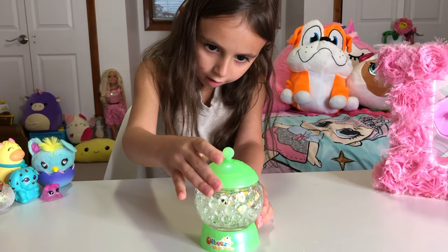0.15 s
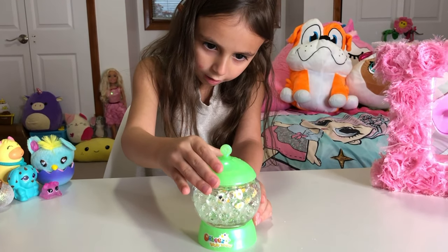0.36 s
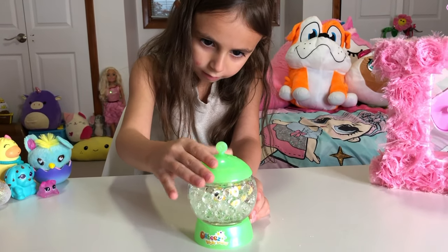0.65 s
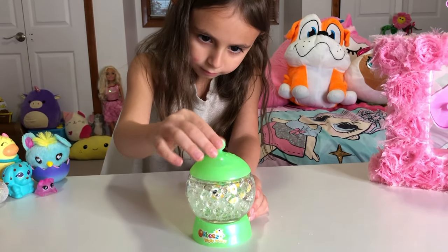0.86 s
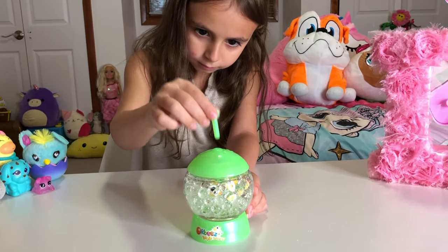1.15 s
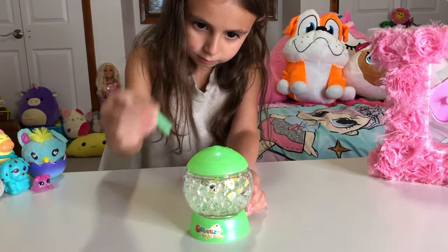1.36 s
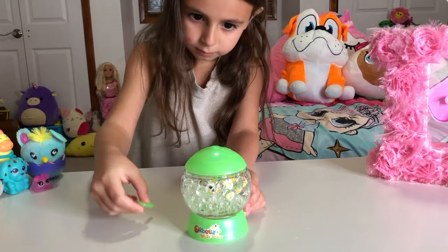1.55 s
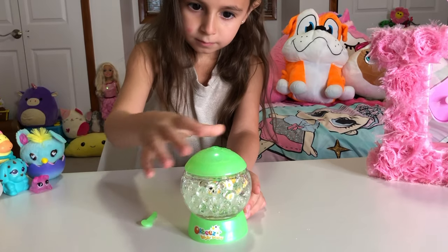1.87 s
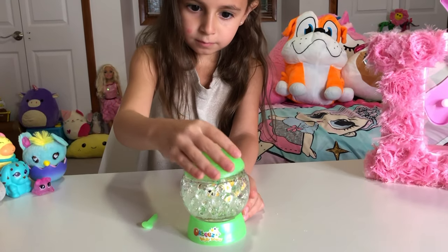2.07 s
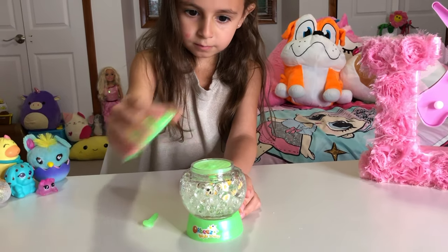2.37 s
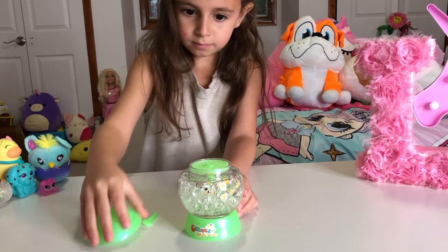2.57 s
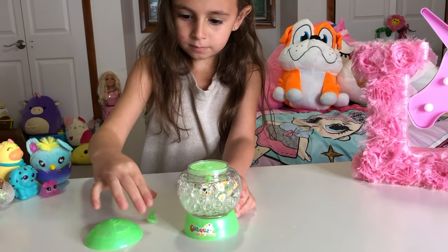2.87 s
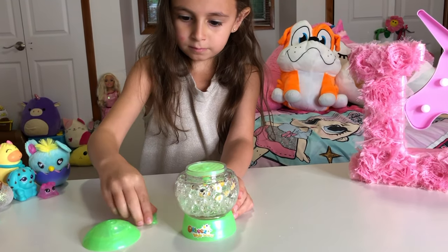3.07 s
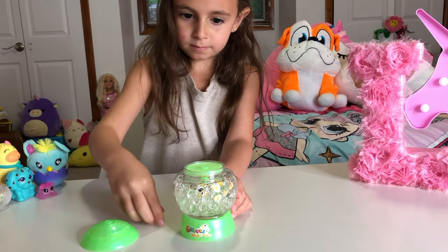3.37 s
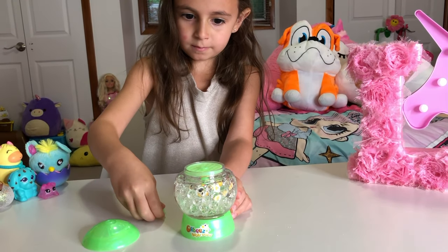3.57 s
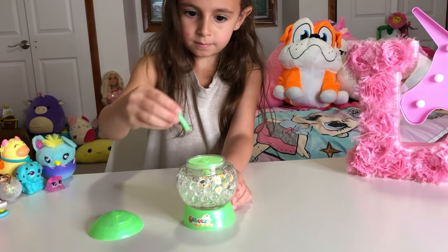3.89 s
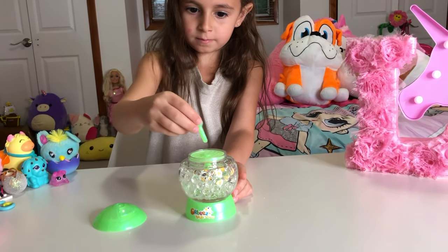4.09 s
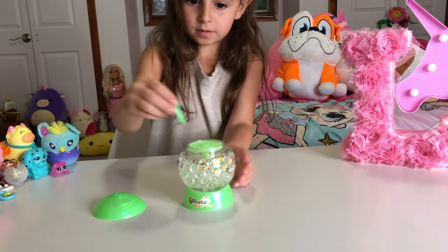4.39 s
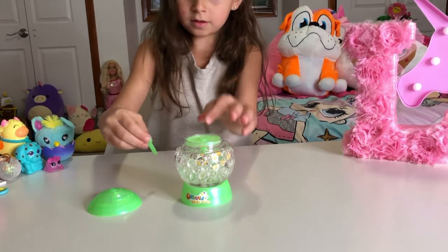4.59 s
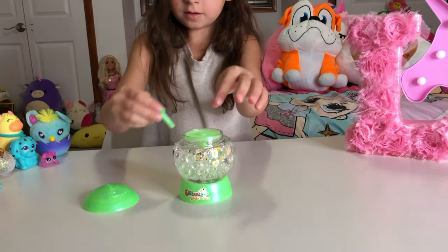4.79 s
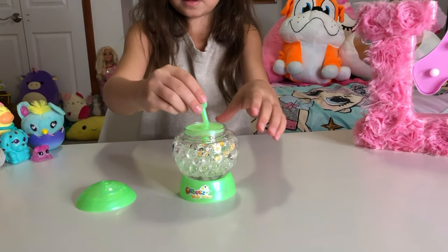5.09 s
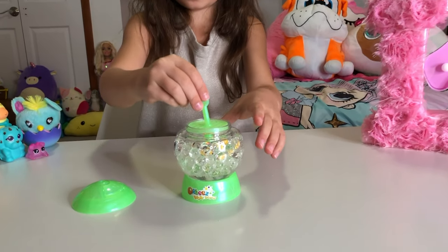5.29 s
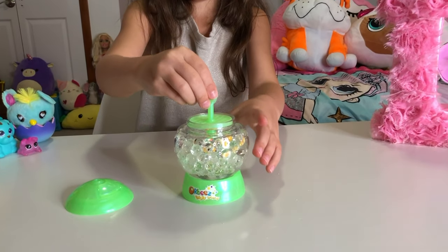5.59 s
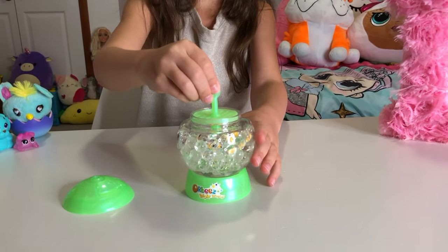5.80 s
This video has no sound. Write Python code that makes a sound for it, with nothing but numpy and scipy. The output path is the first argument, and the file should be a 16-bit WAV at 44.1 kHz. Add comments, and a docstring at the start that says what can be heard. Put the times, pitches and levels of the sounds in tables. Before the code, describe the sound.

Close to one microphone in a small room, a hollow plastic toy clicks as its peg comes out. The peg bounces on the table, and the lid pulls free with a quick cluster of snaps. Set down, the lid knocks loudly and wobbles in quickening bounces. After a quieter stretch of fingertip bumps and scuffs, the peg taps lightly at the toy. A low machine hum and faint hiss continue underneath.

```python
"""A plastic toy gumball globe, handled on a table in a small bedroom, close to a single microphone.
Its peg is pulled from the top and drops rattling; the lid snaps off, is put down and wobbles to rest;
then the peg pokes at the globe. Each contact briefly rings the plastic or the table, amid light scuffs.
Behind it lie the room's short echo, a low machine hum, a faint hiss and slowly swaying air."""
import sys
import numpy as np
from scipy import signal
from scipy.fft import rfft, irfft, next_fast_len
from scipy.io import wavfile

SR = 44100
rng = np.random.default_rng(int(sys.argv[2]) if len(sys.argv) > 2 else 0)


def bounce(signal):
    """Save signal as a 16-bit WAV file at the path given by the first command-line argument."""
    frames = np.transpose(np.atleast_2d(signal))
    limited = np.clip(frames, -1, 1)
    pcm = np.round(limited * 32767).astype(np.int16)
    wavfile.write(sys.argv[1], SR, pcm)


N = 262350
TIME = np.arange(N) / SR
AGE = TIME[:SR // 4]   # s since a contact
THUMP_HZ, KNOCK_HZ, CLICK_HZ = 165, 650, 2300   # where bass, middle and treble begin
CUTOFF_HZ = 15900

# Touches: t/s, bass level/dB, hardness/dB gained per step from bass to middle to treble
UNPLUG_TAPS = [(.562, -52, -9.5), (.6914, -32.5, 0.5), (.7286, -34, -3), (.7365, -59, 3)]
CATCH_SNAPS = [(.636, -47.5, -21), (.8945, -46.5, -10), (1.998, -45.5, -22), (2.009, -47, -18),
               (2.038, -49.5, -6.5), (2.0902, -31.5, -11.5), (2.0975, -41.5, 0), (2.1025, -35, -8),
               (2.1211, -36, 2)]
TIP_POKES = [(5.104, -46, -9), (5.2512, -44.5, 0.5), (5.357, -55, -6.5), (5.523, -47, -18.5),
             (5.559, -39.5, -9.5)]
FINGERTIP_THUDS = [(3.036, -41.5, -14), (3.05, -50.5, -3.5), (3.07, -53, -6.5)]
# Loose pieces striking the table: t/s, strength/dB
PEG_LANDINGS = [(1.6467, -52.5), (1.654, -52), (1.6583, -59), (1.7054, -40), (1.7314, -37.5),
                (1.7403, -44.5), (1.748, -55), (1.7668, -52), (1.7781, -50.5), (1.7876, -54),
                (1.8027, -53.5), (1.824, -70), (3.415, -64), (3.6825, -58.5), (3.689, -63)]
LID_LANDINGS = [(2.6208, -20), (2.627, -30), (2.753, -20), (2.7955, -28), (2.8353, -29.5), (2.8488, -35),
                (2.8691, -28.5), (2.8908, -30.5), (2.903, -32.5), (2.9106, -34)]
# Modes of each struck thing: f/Hz, least width/Hz, relative level/dB
GLOBE_RING = [(190, 6.5, -15), (257, 26, 7.5), (284, 13, 0), (354, 46, -6), (493, 150, -8.5),
              (670, 120, -12), (860, 190, -14), (1170, 71, -21), (1490, 160, -15), (1620, 60, -25),
              (2830, 97, -38), (3570, 150, -22), (3940, 320, -15.5), (4550, 340, -22), (5770, 250, -21),
              (6700, 450, -29), (7800, 840, -33), (12100, 1000, -26)]
RIM_RING = [(187, 11, -33), (260, 9, -4), (342, 35, 3.5), (428, 44, -3), (580, 69, -12), (724, 58, -11),
            (846, 110, -6), (962, 240, -10), (1190, 160, -10), (1480, 120, -11), (1660, 210, -14.5),
            (2640, 460, -15.5), (3730, 450, -18.5), (4650, 190, -16.5), (5600, 290, -25), (8550, 2000, -27),
            (11800, 1200, -33)]
POKE_RING = [(200.3, 10, -4.5), (257.4, 37, 0), (360, 24, -7.5), (525, 110, -20), (1066, 87, -17),
             (1190, 106, -20), (2760, 150, -38), (3500, 240, -17), (4200, 260, -15.5), (4750, 290, -21),
             (8950, 1200, -27)]
PEG_RING = [(257, 27, 7), (363, 43, 3), (525, 55, 5), (674, 44, 11.5), (1070, 190, -6), (1670, 280, 4),
            (2390, 870, -6), (3830, 770, 4), (4530, 900, 4), (6050, 770, 4), (9800, 2000, -9),
            (12500, 3000, -18)]
LID_RING = [(188, 20, -18), (268, 15, -14), (384, 28, 1), (530, 105, 1), (664, 42, -7), (980, 54, -29),
            (1016, 55, -6.5), (1185, 36, -13), (1270, 38, 4), (1392, 123, 3), (1527, 79, 0.5),
            (1586, 120, -2.5), (1645, 57, -16.5), (2140, 120, -25), (2540, 350, -13), (3980, 200, -9.5),
            (4420, 210, -16.5), (6200, 280, -19), (8700, 990, -29), (11200, 1000, -22)]
TABLE_RING = [(194, 26, -0.5), (254.5, 14, 5.5), (276, 24, -14), (363, 46, -6), (596, 110, -17),
              (3530, 590, -22.5)]
# Dips in the globe's spectrum: f/Hz, width/Hz, gain/dB
GLOBE_DIPS = [(1080, 140, -7), (1930, 420, -9), (5150, 450, -5), (10400, 1500, -7)]
# Brief scuffs, light ticks and a bright accent on one lid bounce: t/s, half length/s, level/dB, f/Hz
SCUFFS_AND_TICKS = [(0.7297, 0.0012, -39, 3700), (.733, 0.0061, -45, 1580), (1.024, 0.026, -63.5, 840),
                    (1.026, 0.028, -64.5, 5300), (2.012, 0.014, -60, 493), (2.721, 0.02, -53.5, 4370),
                    (2.833, .004, -33, 1370), (2.893, 0.0021, -34.5, 4200), (3.058, 0.036, -67, 4930),
                    (3.529, 0.051, -61.5, 700), (3.683, 0.011, -55.5, 2460), (4.40, 0.1, -71.5, 870),
                    (4.44, 0.04, -70, 2500), (4.493, 0.0073, -61, 8950), (4.52, 0.0073, -59.5, 2060)]
# Dull shifts of an arm: t/s, level/dB
ARM_MOVES = [(2.88, -49), (3.18, -51), (4.53, -43), (4.64, -39)]
# The bedroom's reverberation: f/Hz, level/dB, t60/s
BEDROOM_BANDS = [(148, -15, 0.41), (388, -1.5, 0.21), (805, -7.5, 0.28), (1560, -9, 0.41),
                 (3030, -10.5, 0.34), (6000, -9.5, 0.28), (10000, -7, 0.28), (16000, -22, .22)]
# Low machine hum in the house: f/Hz, width/Hz, level/dB
HOUSE_HUM = [(14.6, 5, -44.5), (64.6, 10.3, -52.5), (102.4, 23, -62.5), (257.7, 4.3, -70.5),
             (355.5, 7.7, -80)]
# Spectrum of the hiss: f/Hz, relative level/dB
HISS_SHAPE = [(76, -36), (130, -17), (141, -19.5), (172, -7), (224, -10), (258, -4.5), (285, -7),
              (342, -7.5), (410, -10.5), (435, -11), (796, -18), (5960, -21), (16000, -24.5)]


def globe():
    """The hollow globe rings under the hand, with a few dips in its spectrum."""
    # the peg is wiggled and unplugged
    taps = strikes(pressed(UNPLUG_TAPS, middle_db=-2), GLOBE_RING, snap_db=-57,
                   crack=(-28, 0.011), chatter=(4.5, 0.0047), top_hz=10800, db_per_octave=15,
                   detune=0.0075)
    # the lid is gripped and slips over its catch
    snaps = strikes(pressed(CATCH_SNAPS, middle_db=3.5), RIM_RING, snap_db=-54,
                    crack=(-31.5, 0.011), chatter=(-1, 0.011), top_hz=10800, db_per_octave=12,
                    detune=0.0039)
    # the peg's tip pokes into the open top
    pokes = strikes(pressed(TIP_POKES, middle_db=-0.5), POKE_RING, snap_db=-57,
                    crack=(-33, 0.018), chatter=(-4.5, 0.0087), top_hz=6900, db_per_octave=8.5,
                    detune=0.0065)
    shell = taps + snaps + pokes
    for hz, width, db in GLOBE_DIPS:
        notched = signal.lfilter(*signal.iirnotch(hz, hz / width, fs=SR), shell)
        shell = from_db(db) * shell + (1 - from_db(db)) * notched
    return shell


def peg_rattle():
    """The loose peg bounces on the table in bright clicks."""
    contacts = dropped(PEG_LANDINGS, colour_db=(-13, -5, 0), shares=(0.5, 0.59, 1.0))
    return strikes(contacts, PEG_RING, snap_db=-22, crack=(2.5, 0.0043), chatter=(-1.5, 0.04),
                   top_hz=12300, db_per_octave=11, detune=0.019)


def lid_wobble():
    """The lid is put down, let go and wobbles to rest in quickening bounces."""
    contacts = dropped(LID_LANDINGS, colour_db=(-15, 0, -7), shares=(0.56, 0.81, 1.16))
    return strikes(contacts, LID_RING, snap_db=-19.5, crack=(-19.5, 0.039), chatter=(1.5, 0.03),
                   top_hz=11460, db_per_octave=17.5, detune=0.014)


def lid_roll(let_go_s=2.7, relative_db=-9.5, rise_t60=0.03, fall_t60=0.1):
    """Once let go, the rim rolls into and out of each bounce and keeps the lid's main ring sounding."""
    power = 0
    for s, db in LID_LANDINGS:
        if s > let_go_s:
            t60 = np.where(TIME < s, rise_t60, fall_t60)
            power += (from_db(db + relative_db) * fade(np.abs(TIME - s), t60)) ** 2
    return np.sqrt(power) * hum(centre_hz=1380, width_hz=980)


def finger_thuds():
    """Fingertips land on the table and ring its low modes."""
    return strikes(pressed(FINGERTIP_THUDS, middle_db=-0.5), TABLE_RING, snap_db=-53,
                   crack=(-27, 0.031), chatter=(-6, 0.036), top_hz=8500, db_per_octave=25, detune=0.0088)


def pressed(touches, middle_db):
    """Time and bass, middle and treble levels of each touch: its hardness tilts them."""
    return [(s, db, db + hardness + middle_db, db + 2 * hardness) for s, db, hardness in touches]


def dropped(bounces, colour_db, shares):
    """Bass, middle and treble each lose their share of what a bounce lacks against the hardest."""
    hardest_db = max(db for s, db in bounces)
    return [(s, *[hardest_db + colour + share * (db - hardest_db)
                  for colour, share in zip(colour_db, shares)]) for s, db in bounces]


def strikes(contacts, modes, snap_db, crack, chatter, top_hz, db_per_octave, detune):
    """A snap and a chatter ring the main modes; dense short ones crack. Bursts are (level/dB, t60/s)."""
    out = np.zeros(N + len(AGE))
    hz, width, mode_db = np.transpose(modes)
    width = np.maximum(width, hz / 28)   # soft plastic is lossy: a few dozen cycles at most
    heights = from_db(mode_db) * 2 * np.pi * width / SR
    decays = np.exp(-np.pi * width[:, None] * AGE)
    hardest_db = max(row[-1] for row in contacts)
    for s, *levels_db in contacts:
        # spot and grip vary each mode's pitch and strength
        pitches = hz * np.exp(detune * rng.standard_normal(len(hz)))
        strengths = heights * from_db(rng.standard_normal(len(hz)))
        ring = strengths @ (np.sin(2 * np.pi * pitches[:, None] * AGE) * decays)
        blow = ring + signal.fftconvolve(ring, burst(*chatter))[:len(AGE)] + burst(*crack)
        blow[0] += from_db(snap_db)
        # a lighter touch stays in contact longer and so is duller
        edge_hz = top_hz * 2 ** ((levels_db[-1] - hardest_db) / db_per_octave)
        blow = cut(blow, [THUMP_HZ, edge_hz], "band")
        bass = cut(blow, KNOCK_HZ, "low", order=3)
        middle = cut(blow, [KNOCK_HZ, CLICK_HZ], "band", order=3)
        treble = cut(blow, CLICK_HZ, "high", order=3)
        start = int(s * SR)
        for part, db in zip((bass, middle, treble), levels_db):
            out[start:start + len(AGE)] += from_db(db) * part / np.std(part[:SR // 100])
    return out[:N]


def scuffs_and_ticks(grain_db=4):
    """Brief scuffs, light ticks and a bright accent on one lid bounce: grainy noise swells and dies."""
    out = np.zeros(N)
    peak_s = AGE.mean()
    for s, half_length, db, hz in SCUFFS_AND_TICKS:
        grains = rng.standard_normal(len(AGE)) * from_db(grain_db * rng.standard_normal(len(AGE)))
        octave = rms_one(cut(grains, [hz / np.sqrt(2), hz * np.sqrt(2)], "band"))
        start = int((s - peak_s) * SR)
        out[start:start + len(AGE)] += from_db(db) * swell(AGE - peak_s, half_length) * octave
    return out


def bedroom(x, build_up_s):
    """Diffuse echoes build up at the microphone over a few milliseconds and die band by band."""
    t = TIME[:SR * 2 // 3]
    edges = np.geomspace(100, CUTOFF_HZ, 15)
    room_hz, room_db, room_t60 = np.transpose(BEDROOM_BANDS)
    white = rng.standard_normal((2, len(t)))
    onset = 1 - swell(t, build_up_s)
    response = 0
    for k, (low, high) in enumerate(zip(edges, edges[1:])):
        log_centre = np.log(low * high) / 2
        envelope = onset * fade(t, np.interp(log_centre, np.log(room_hz), room_t60))
        gain = from_db(np.interp(log_centre, np.log(room_hz), room_db)) / np.linalg.norm(envelope)
        response += gain * cut(white[k % 2] * envelope, [low, high], "band")
    return signal.fftconvolve(x, response)[:N]


def background():
    """Room tone: hiss, machine hum, a low draught, air swaying below hearing, and an arm shifting."""
    hiss_hz, hiss_db = np.transpose(HISS_SHAPE)
    hiss = from_db(-61.5) * noise(lambda hz: from_db(np.interp(np.log(hz), np.log(hiss_hz), hiss_db)))
    machine = sum(from_db(db) * hum(hz, width) for hz, width, db in HOUSE_HUM)
    draught = from_db(-57) * hum(centre_hz=30, width_hz=64)
    sway = from_db(-31) * hum(centre_hz=3.38, width_hz=2.18)
    arm_motion = sum(from_db(db) * swell(TIME - s, half_length_s=0.055) for s, db in ARM_MOVES)
    arm = arm_motion * hum(centre_hz=64, width_hz=27)
    return hiss + machine + draught + sway + arm


def hum(centre_hz, width_hz):
    """Noise in one steep-sided resonance."""
    return noise(lambda hz: 1 / (1 + ((hz - centre_hz) / (width_hz * 2 / 3)) ** 2))


def noise(gain_at):
    """Noise of rms 1 whose spectrum is a function of frequency."""
    size = next_fast_len(N)
    hz = np.maximum(np.arange(size // 2 + 1) * SR / size, 1e-3)
    return rms_one(irfft(rfft(rng.standard_normal(size)) * gain_at(hz), size)[:N])


def burst(db, t60):
    """Dying noise with the energy of one click of that level."""
    x = rng.standard_normal(len(AGE)) * fade(AGE, t60)
    return from_db(db) * x / np.linalg.norm(x)


def swell(t, half_length_s):
    """A smooth rise and fall around t = 0."""
    return np.exp(-(t / half_length_s) ** 2)


def fade(t, t60):
    """A decay that loses 60 dB in t60."""
    return np.exp(-np.log(1000) * t / t60)


def cut(x, hz, kind, order=2):
    """Causal Butterworth filter."""
    return signal.sosfilt(signal.butter(order, np.minimum(hz, SR * 9 / 20), kind, fs=SR, output="sos"), x)


def from_db(db):
    """Decibels to gain."""
    return 10 ** (np.asarray(db) / 20)


def rms_one(x):
    """Scale to rms 1."""
    return x / np.sqrt(np.mean(x ** 2) + 1e-20)


def scene():
    """The handling close up, the bedroom around it and the room tone behind, in mono."""
    handling = globe() + peg_rattle() + lid_wobble() + finger_thuds() + lid_roll() + scuffs_and_ticks()
    return (handling + bedroom(handling, build_up_s=0.0026) + background())[None]


def record(dry):
    """After the microphone the highest peaks are rounded and the top is cut steeply."""
    headroom = from_db(-14)
    rounded = headroom * np.tanh(dry / headroom)
    return signal.sosfilt(signal.ellip(10, .1, 80, CUTOFF_HZ, fs=SR, output="sos"), rounded)


dry = scene()
out = record(dry)
bounce(out)
```